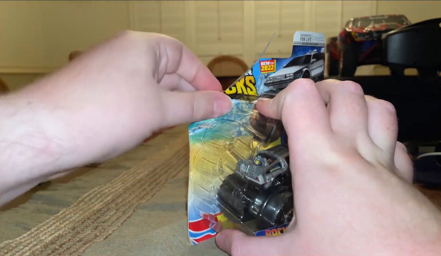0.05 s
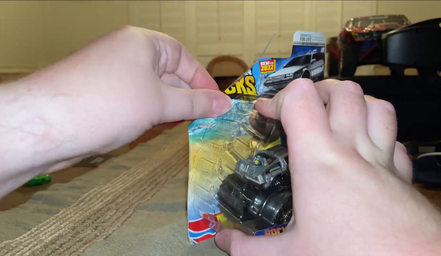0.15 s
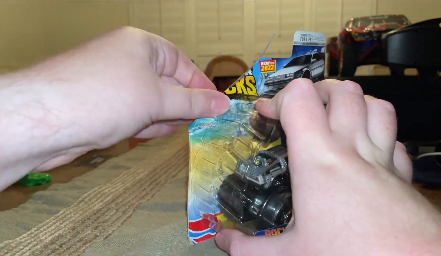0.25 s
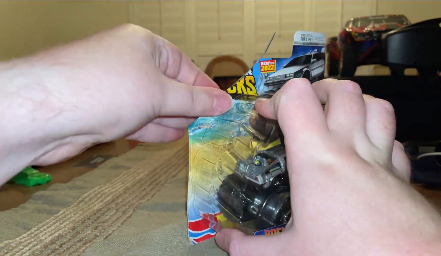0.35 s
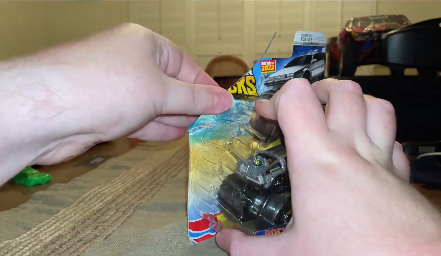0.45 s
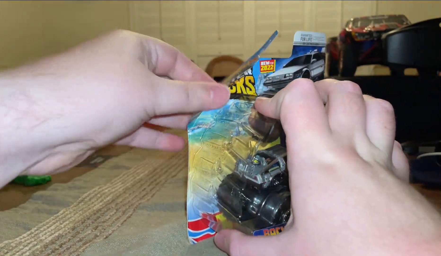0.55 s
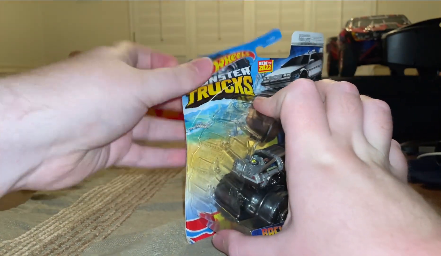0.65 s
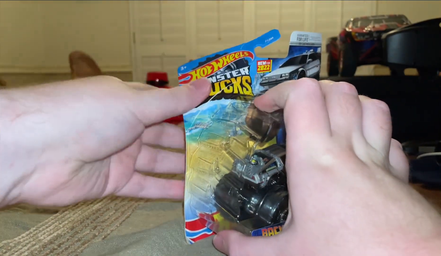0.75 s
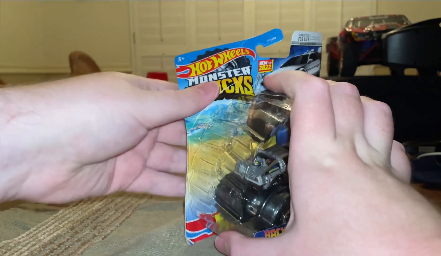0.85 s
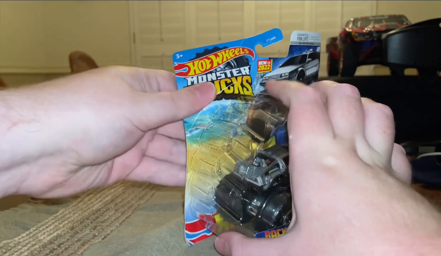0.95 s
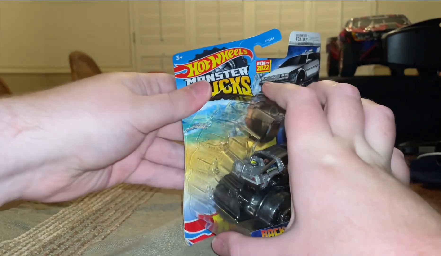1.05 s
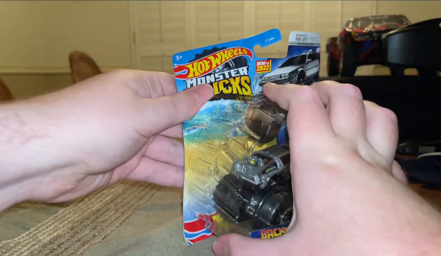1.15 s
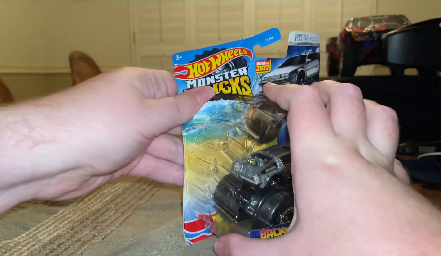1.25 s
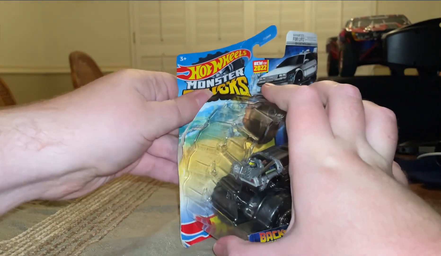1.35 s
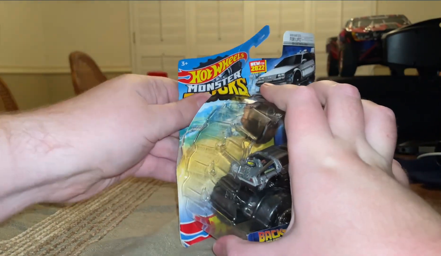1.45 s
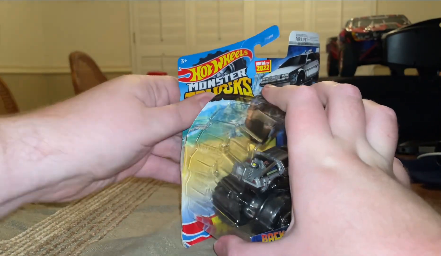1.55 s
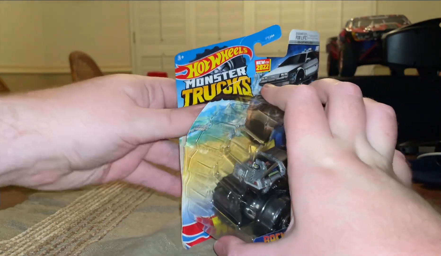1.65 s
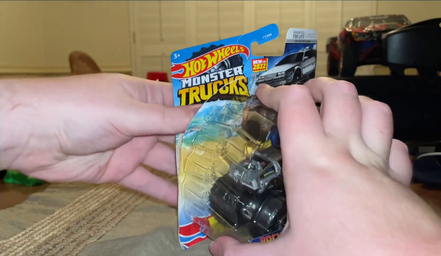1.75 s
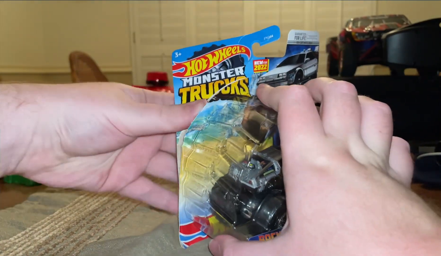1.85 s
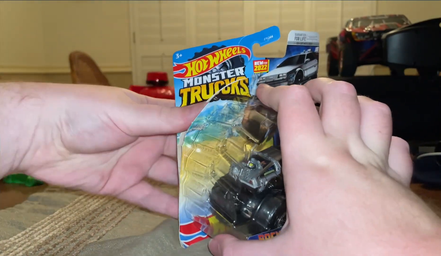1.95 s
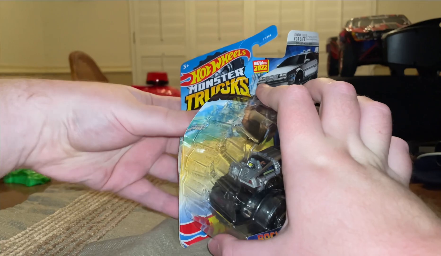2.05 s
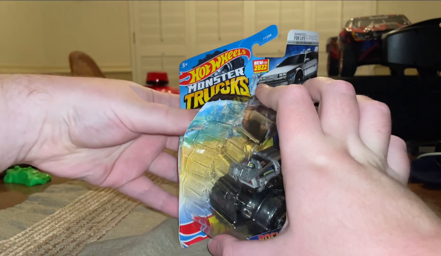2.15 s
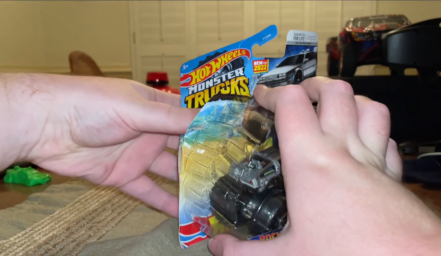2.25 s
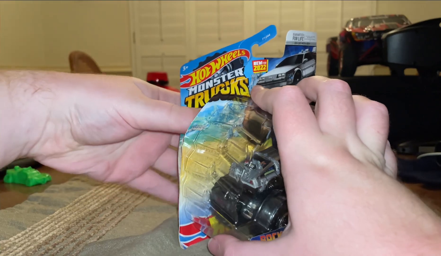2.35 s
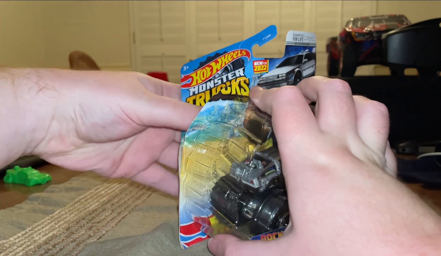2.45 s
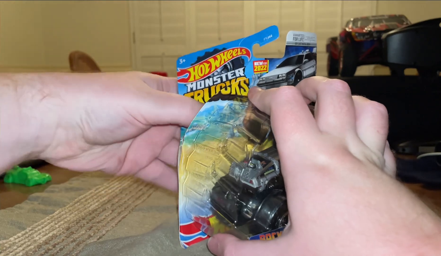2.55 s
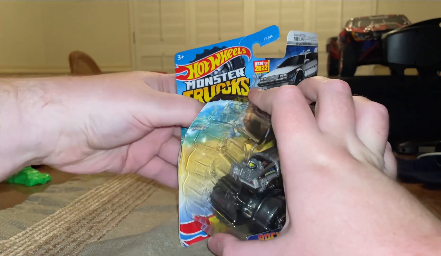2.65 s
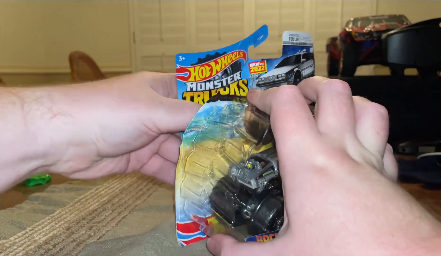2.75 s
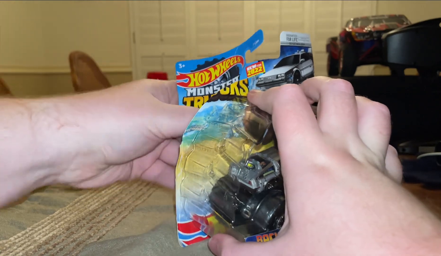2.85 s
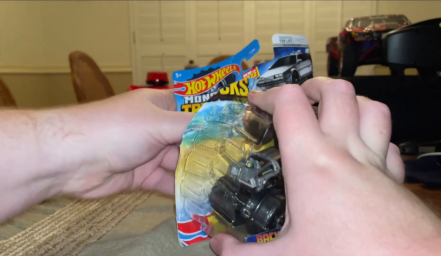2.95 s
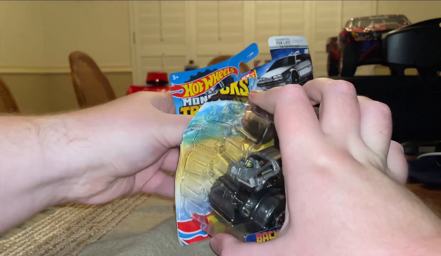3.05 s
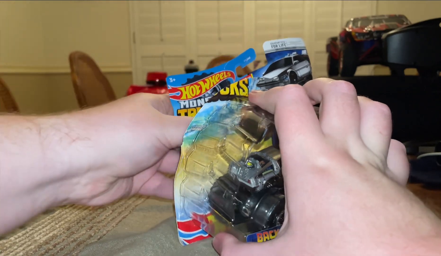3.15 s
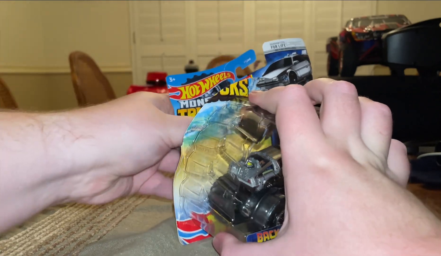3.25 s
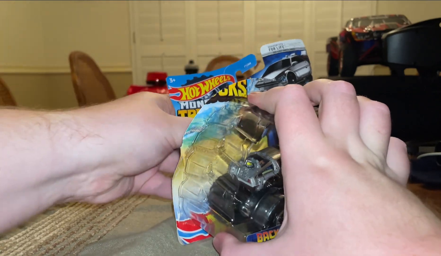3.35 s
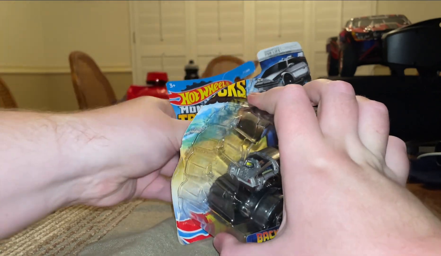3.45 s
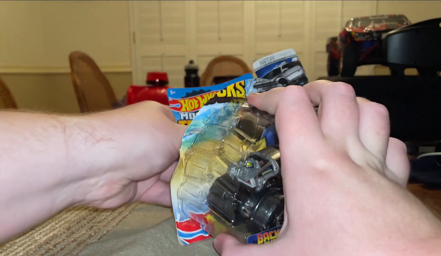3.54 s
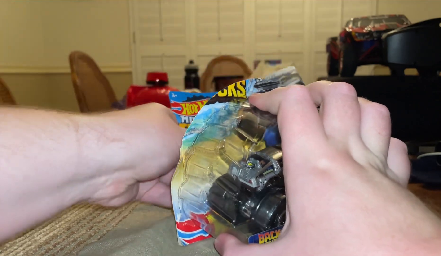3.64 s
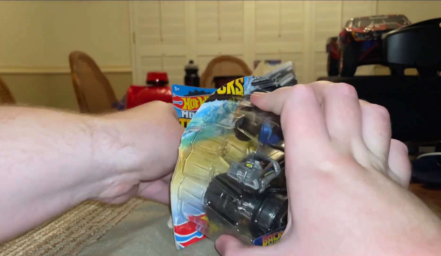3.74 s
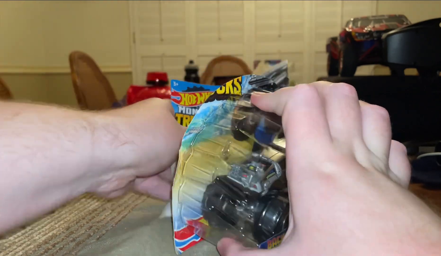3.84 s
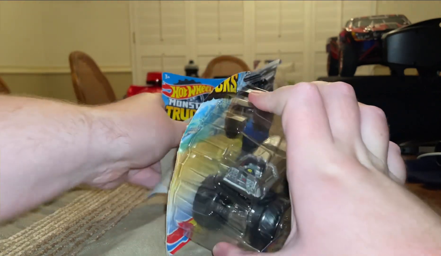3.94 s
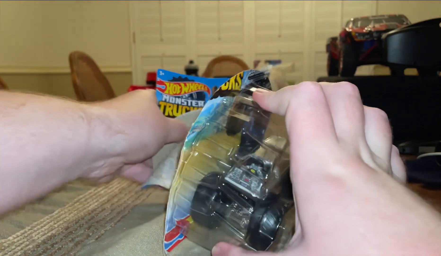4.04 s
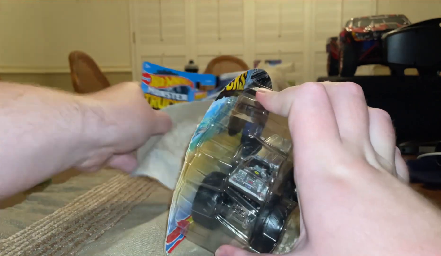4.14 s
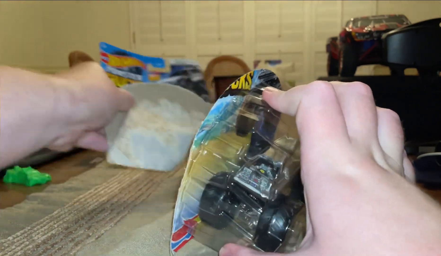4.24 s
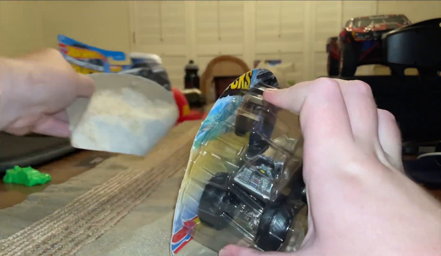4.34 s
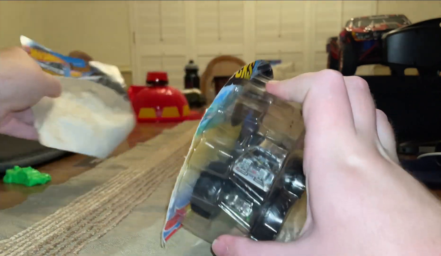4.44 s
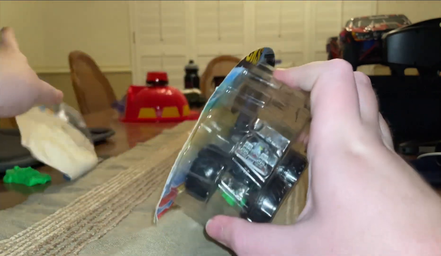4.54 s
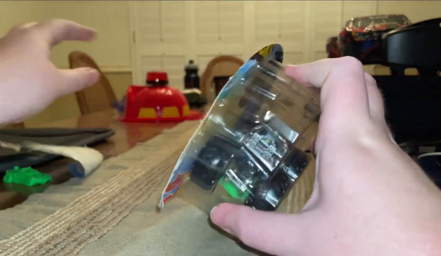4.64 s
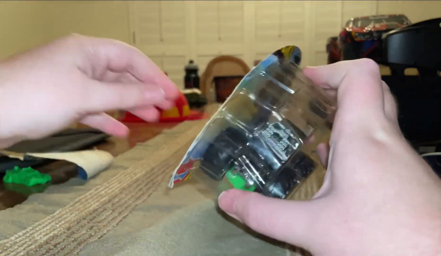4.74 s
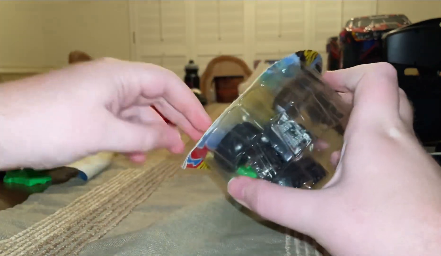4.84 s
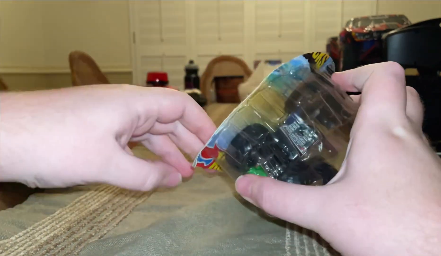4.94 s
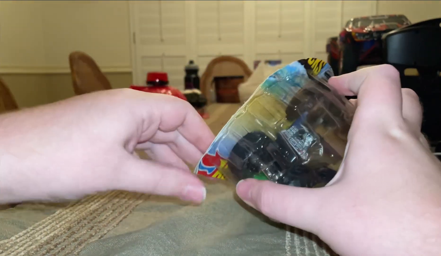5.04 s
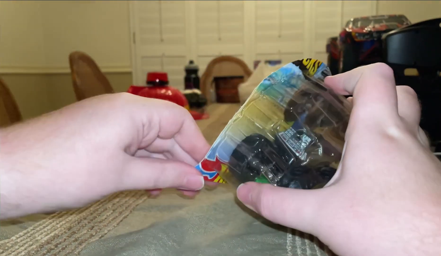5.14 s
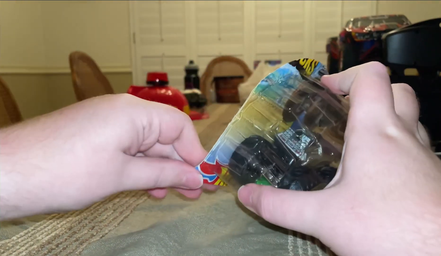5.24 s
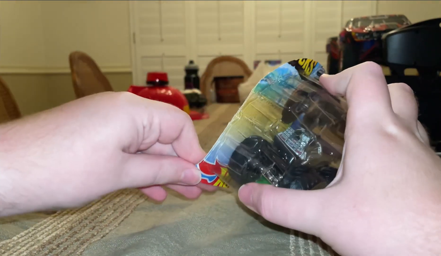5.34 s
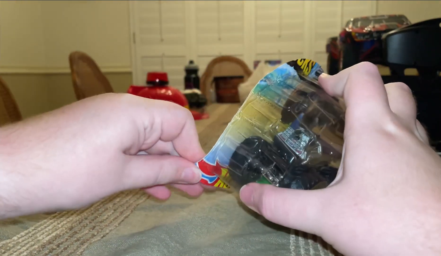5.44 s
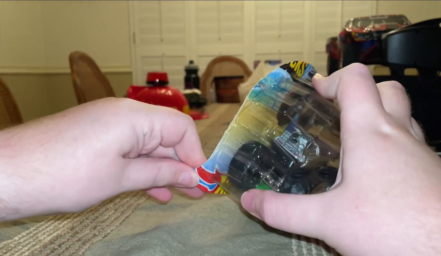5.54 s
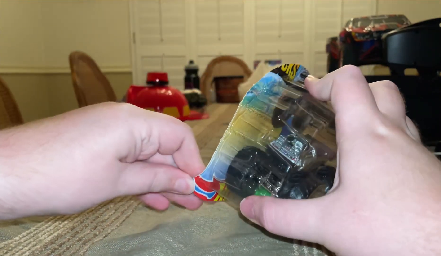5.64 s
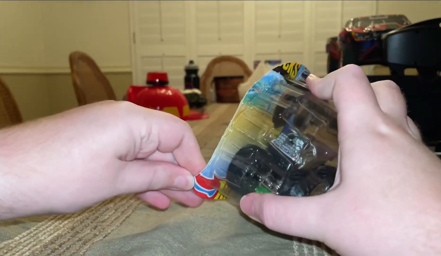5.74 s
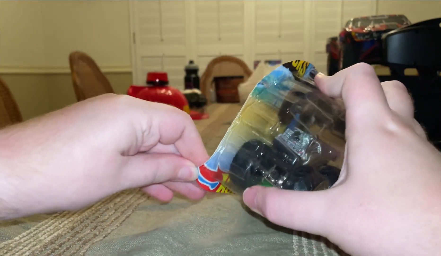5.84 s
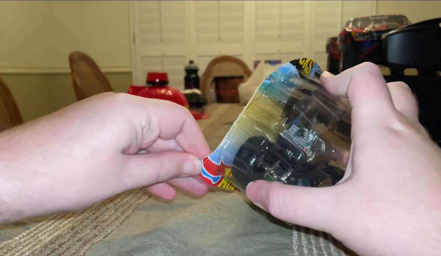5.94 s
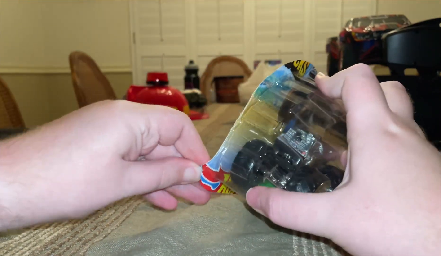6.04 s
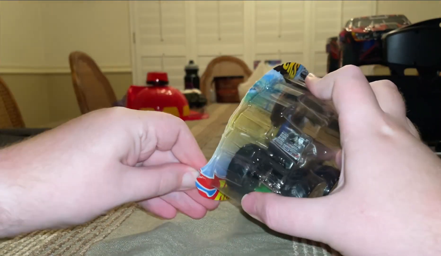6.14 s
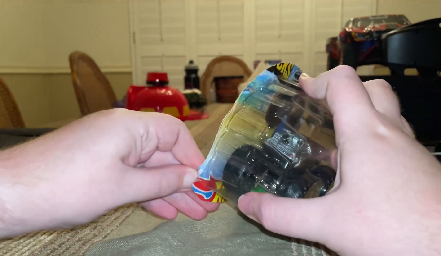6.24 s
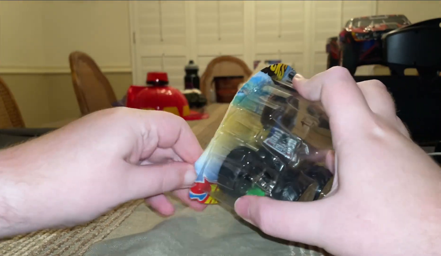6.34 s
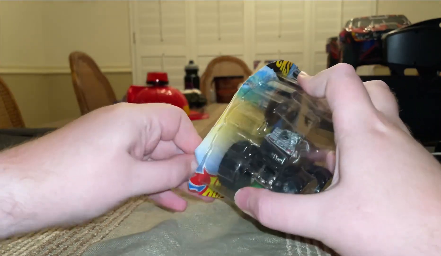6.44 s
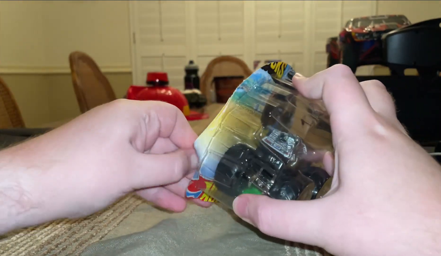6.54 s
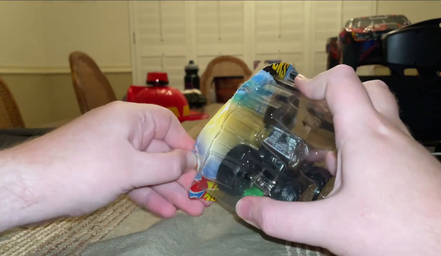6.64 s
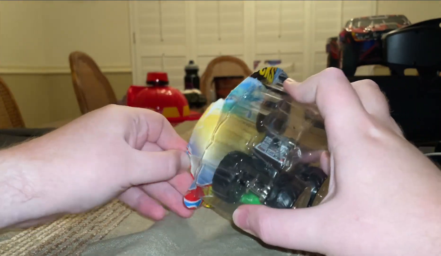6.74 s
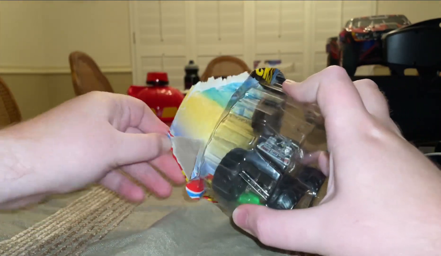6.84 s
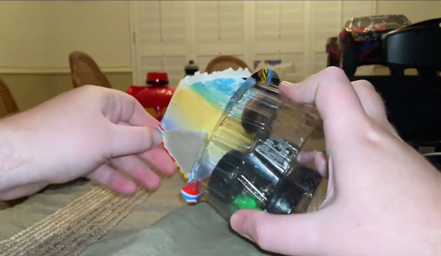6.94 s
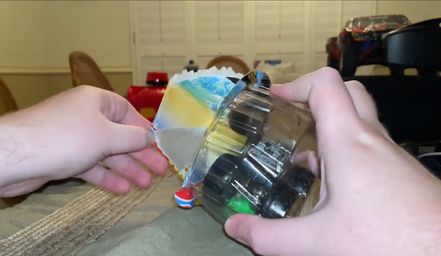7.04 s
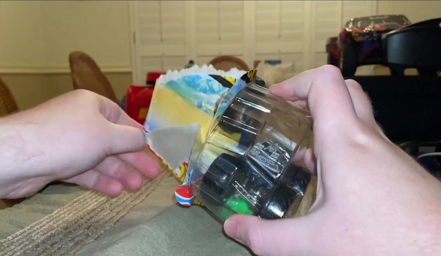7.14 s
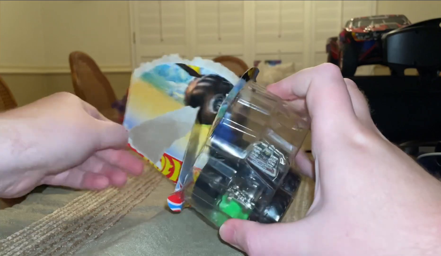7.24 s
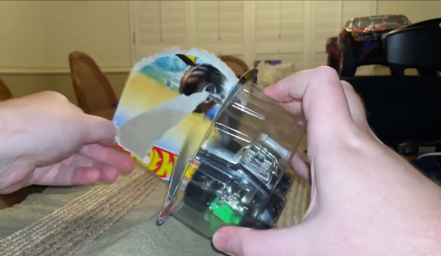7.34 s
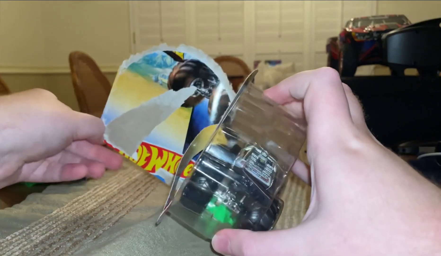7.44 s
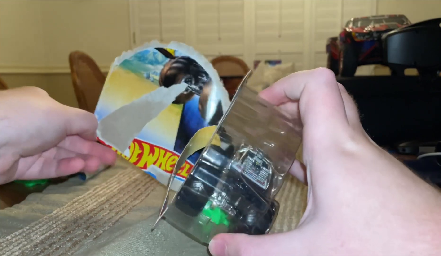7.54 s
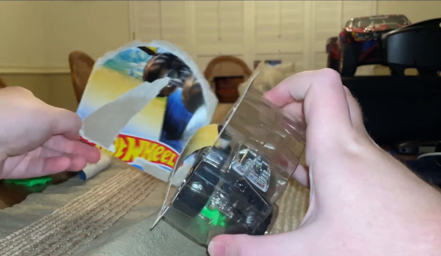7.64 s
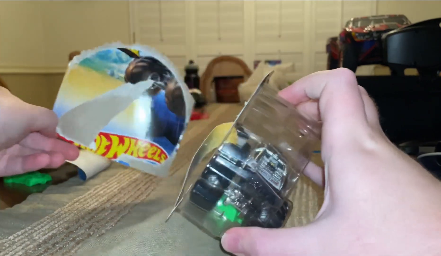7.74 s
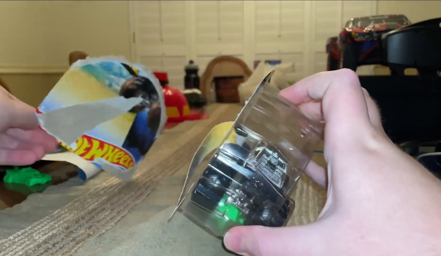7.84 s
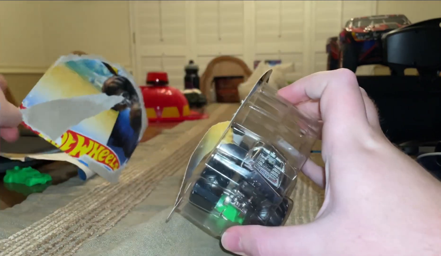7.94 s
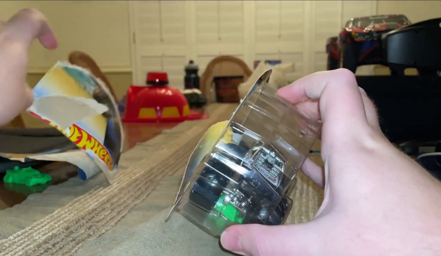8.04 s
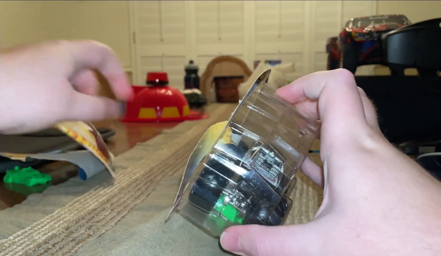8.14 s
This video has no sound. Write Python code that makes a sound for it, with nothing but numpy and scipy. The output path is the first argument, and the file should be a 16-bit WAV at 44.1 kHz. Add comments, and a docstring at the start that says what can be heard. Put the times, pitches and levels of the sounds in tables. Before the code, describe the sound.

Close stereo pickup at a table in a small, lightly echoing room. Thin hard plastic crackles and pops under prying fingers, with a few loud hollow snaps. Cardboard then rips off its glue in jerky tugs with sharp buckling. A near-quiet pause holds small ticks and one soft bump, before a second, denser tearing pull ends abruptly into faint low rumble.

```python
"""A hard plastic blister buckles with sharp snaps as hands pry its cardboard backing off at a table.
Each snap is a noisy crack plus damped tones of the wall, the tray and the card; some floors pop with
a sinking pitch. The card tears off its glue seam in two long pulls, made of random tiny breaks in
three bands. Fingers rub as stick-slip impulses through resonances. Decaying noise makes the echo of
a small room, resonances its boom, over a low rumble and one soft bump of the dropped card."""
import sys
import numpy as np
from scipy import signal
from scipy.fft import rfft, irfft, next_fast_len
from scipy.io import wavfile
from scipy.ndimage import map_coordinates

SR = 44100
rng = np.random.default_rng(int(sys.argv[2]) if len(sys.argv) > 2 else 0)


def waveform_to_disk(signal):
    """Save audio, clipped to [-1, 1], as 16-bit WAV at the path in sys.argv[1]."""
    frames = np.transpose(np.atleast_2d(signal))
    scaled = np.clip(frames, -1, 1) * 32767
    samples = np.round(scaled).astype(np.int16)
    wavfile.write(sys.argv[1], SR, samples)


N = 361179
TOP_HZ = 16300  # nothing sounds above this


def amp(db):
    """Turn decibels into gain."""
    return 10 ** (np.asarray(db) / 20)


def unit(x):
    """Scale x to rms 1."""
    return x / np.sqrt(np.mean(x ** 2) + 1e-20)


def crest(x):
    """Scale x so that its envelope peaks at 1."""
    return x / np.abs(signal.hilbert(x)).max()


def along(points, hz):
    """Read a curve of (Hz, value) points on a log frequency axis."""
    f, v = np.transpose(points)
    return np.interp(np.log(hz + 1), np.log(f + 1), v)


def filtered(x, response):
    """Multiply the spectrum of x by a complex response of frequency."""
    n = x.shape[-1]
    m = next_fast_len(n + 4096)  # padded, so that the end does not wrap to the start
    spectrum = rfft(x, m) * response(np.fft.rfftfreq(m, 1 / SR))
    return irfft(spectrum, m)[..., :n]


def coloured(x, gain, size=2048):
    """Filter x causally (minimum phase) with the given gain of frequency."""
    cepstrum = irfft(np.log(np.maximum(gain(np.fft.rfftfreq(size, 1 / SR)), 1e-6)))
    # folding the second half onto the first puts all the response after time zero
    cepstrum[1:size // 2] *= 2
    cepstrum[size // 2 + 1:] = 0
    return signal.fftconvolve(x, irfft(np.exp(rfft(cepstrum))))[:len(x)]


def wobble(rate):
    """Draw a smooth random curve with this many knots per second."""
    knots = rng.standard_normal(int(N * rate / SR) + 4)
    return map_coordinates(knots, [np.arange(N) * rate / SR])


def slips(rate, spread_db):
    """Tiny impulses at random times, unequal in size and of either sign, scaled to rms 1."""
    size = amp(spread_db * np.minimum(rng.standard_normal(N), 2))
    happens = rng.random(N) < rate / SR
    return unit(happens * size * rng.choice([-1, 1], N))


def add(track, s, sound):
    """Mix a sound into the track at time s."""
    part = track[..., max(round(s * SR), 0):][..., :sound.shape[-1]]
    part += sound[..., :part.shape[-1]]


def resonance(f, hz, width):
    """Response of one damped mode."""
    return 1j * f * width / (hz * hz - f * f + 1j * f * width)


def resonate(x, modes):
    """Send x through resonances side by side, given as (Hz, width Hz, dB)."""
    return filtered(x, lambda f: sum(amp(db) * resonance(f, hz, width) for hz, width, db in modes))


def ring(modes, t, swell_cycles, scatter_db):
    """Damped (Hz, dB, t60) modes, each struck with a new strength and slightly detuned by the grip."""
    hz, db, t60 = np.transpose(modes)[:, :, None]
    strength, detune = rng.standard_normal((2, len(modes), 1))
    waves = np.sin(2 * np.pi * hz * (1 + .01 * detune) * t)
    swell = 1 - np.exp(-(t * hz / swell_cycles) ** 2)  # the sheet takes a moment to flip over
    sides = (-1) ** np.arange(len(modes))[:, None]  # neighbouring modes start in opposite directions
    decay = amp(db + scatter_db * strength - 60 * t / t60)
    motion = np.sum(sides * decay * waves * swell, 0)
    # a thin sheet radiates no deep bass
    no_bass = signal.butter(2, hz.min() / 2, "high", fs=SR, output="sos")
    return crest(signal.sosfilt(no_bass, motion))


def grains(pitch, octaves, cycles, spread_db, count, size):
    """Tiny breaks at random times, each ringing briefly at its own pitch around the (s, Hz) curve."""
    chance = rng.standard_normal((count, 2))
    start, sign = rng.integers(0, N, count), rng.choice([-1, 1], (count, 1))
    centre_hz = np.interp(start / SR, *np.transpose(pitch))
    hz = np.minimum(centre_hz * 2 ** (octaves * chance[:, 0]), TOP_HZ)
    turns = hz[:, None] * np.arange(size) / SR
    strength = sign * amp(spread_db * np.minimum(chance[:, 1:], 2))
    waves = strength * np.sin(2 * np.pi * turns) * np.exp(-turns / cycles)
    where = start[:, None] + np.arange(size)
    return unit(np.bincount(where.ravel(), waves.ravel(), N)[:N])


def ports(x, right_db, lag_ms=0.097, detour=2.2, detour_hz=650):
    """Sound is louder and earlier at the nearer microphone port; the time gap is widest in the low mids."""
    lead = lag_ms / 1000 * np.tanh(right_db)  # seconds
    path = lambda f: 1 + detour * np.exp(-(2 * np.log((f + 1) / detour_hz)) ** 2)
    half = lambda f: amp(right_db / 2) * np.exp(1j * np.pi * f * lead * path(f))
    return filtered(x, lambda f: np.array([1 / half(f), half(f)]))


# The colour of the low noise. Each row: frequency in Hz, relative level in dB.
RUMBLE_COLOUR = [(20, -21.5), (52, -5.5), (108, -9), (165, -2.5), (250, -10.5), (360, -8), (440, -19.5),
                 (540, -35.5), (1000, -34.5), (3000, -36), (6000, -41.5), (8500, -64), (11000, -52.5),
                 (16000, -72.5)]


def rumble(db=-60, side_db=-11):
    """The low steady noise of the house: coloured noise, mostly alike on both sides."""
    noise = rng.standard_normal((2, N))
    mid, side = unit(filtered(noise, lambda f: amp(along(RUMBLE_COLOUR, f))))
    return amp(db) * np.array([mid + amp(side_db) * side, mid - amp(side_db) * side])


# How long the room rings. Each row: frequency in Hz, time to fade by 60 dB in seconds.
ROOM_FADE = [(150, 0.36), (400, 0.18), (1000, 0.59), (3000, 0.5), (7000, 0.32), (14000, 0.08)]


def room(x, wet_db, early_db, count=5):
    """Early bounces off table and walls, then a tail; noise patterns take turns as the pack moves."""
    out, t = np.zeros((2, N)), np.arange(N) / SR
    for k in range(count):
        hz, age, z = signal.stft(rng.standard_normal((2, SR // 2)), SR, nperseg=256)
        apart = np.clip(hz / 1600, 0, 1)[:, None] * np.pi / 4  # long waves reach both ports alike
        z = np.array([np.cos(apart) * z[0] + side * np.sin(apart) * z[1] for side in (1, -1)])
        late = amp(wet_db - 60 * age / along(ROOM_FADE, hz)[:, None])
        early = amp(early_db - 60 * age / 0.052)
        onset = np.clip(age / 0.0026, 0, 1)
        tail = signal.istft(z * (late + early) * onset, SR, nperseg=256)[1] / np.sqrt(SR / 40)
        # each pattern fades in and out again, eight steps a second
        place = np.abs((t * 8 - k + count / 2) % count - count / 2)
        share = np.cos(np.minimum(place, 1) * np.pi / 2)
        out += signal.fftconvolve((x * share)[None], tail, axes=1)[:, :N]
    return out


# The colour of the room's answer. Each row: frequency in Hz, gain in dB.
ECHO_COLOUR = [(60, -1.5), (200, 4), (340, 5.5), (560, 4), (850, -5), (1130, -2), (1450, 1.5), (2400, 4.5),
               (5000, 2.5), (14000, 2.5)]


def echo(shell, floor, card):
    """The room answers the right-hand sound of the plastic and, more strongly, of the card."""
    answer = room(shell[1] + amp(-2.5) * floor[1], wet_db=-17.5, early_db=-8.5)
    answer += room(card[1], wet_db=-10.5, early_db=-4.5)
    return filtered(answer, lambda f: amp(along(ECHO_COLOUR, f)))


# Standing waves between table and walls. Each row: frequency in Hz, width in Hz, gain in dB.
STANDING_WAVES = [(164, 4.5, -4), (217, 7.5, -8.5), (258.2, 6.6, 4.5), (344.4, 2.9, 1.5), (430, 6.4, -7.5),
                  (487, 9.9, -7.5)]


def boom(shell, card):
    """Shell and card set off the standing waves of the room."""
    return resonate(shell + amp(-6.5) * card, STANDING_WAVES)


LANDING_S = 4.872


def landing(db=-42, hz=48, t60=0.18):
    """The torn-off card drops on the table, which gives one soft, deep bump."""
    out, t = np.zeros(N), np.arange(SR // 3) / SR
    modes = [(hz, 0, t60), (2.56 * hz, -3, t60 / 2)]
    add(out, LANDING_S, amp(db) * ring(modes, t, swell_cycles=0.27, scatter_db=-4))
    return out


# Fingers and card slide on the plastic. Each row: start in seconds, swell in seconds, fade in seconds,
# level in dB before the stereo placing, pitch in Hz, half the width in Hz of each of the two equal
# resonances in a row, slips per second.
RUBS = [(0.291, .054, 0.0082, -40.5, 10970, 2313, 1900), (1.071, 0.033, 0.041, -58, 11000, 9060, 210),
        (1.102, 0.18, 0.054, -46, 6740, 554, 1400), (1.206, 0.073, 0.23, -47.5, 11000, 3057, 1100),
        (1.831, 0.048, 0.025, -31.5, 924, 129.4, 1400), (1.827, 0.054, 0.011, -49, 5200, 1600, 860),
        (1.872, 0.011, 0.011, -47, 4500, 501, 970), (1.993, 0.01, 0.037, -38.5, 885, 219, 1100),
        (1.994, 0.0043, 0.017, -41.5, 5100, 1300, 750), (2.448, 0.07, 0.24, -59.5, 6000, 7000, 120),
        (4.574, 0.01606, 0.061, -42, 2300, 623, 1600), (4.578, 0.021, 0.028, -43, 1290, 220, 2400),
        (5.02, 0.017, 0.135, -65.5, 840, 488, 290), (5.11, .035, 0.039, -71.5, 4940, 5120, 1400),
        (5.34, 0.042, 0.045, -73.5, 4900, 5000, 1400), (5.519, 0.0034, .006, -58, 9560, 9170, 2300),
        (6.082, 0.077, 0.028, -52.5, 10700, 7310, 690), (6.2, 0.029, 0.074, -53, 11000, 7220, 370),
        (6.27, 0.023, 0.032, -44, 550, 250, 670), (6.4, 0.027, 0.041, -41.5, 507, 260, 620),
        (6.505, 0.049, 0.02, -42, 910, 392, 220), (6.324, 0.02, 0.044, -39, 9400, 7130, 2200),
        (6.446, 0.046, 0.13, -43.5, 8750, 6000, 1500), (6.58, .11, .03, -40, 820, 399, 760),
        (6.92, 0.05, 0.15, -35.5, 880, 402.6, 900), (6.93, .04, .13, -40.5, 4200, 4020, 350),
        (3.46, .04, .06, -47, 8500, 6900, 2300), (7.555, 0.017, 0.034, -47.5, 8400, 7000, 2300),
        (8.12, 0.027, 0.057, -67, 6530, 7960, 1900)]


def rubbing():
    """Stick-slip under a sliding finger or card edge excites one resonance of the sheet."""
    out, t = np.zeros(N), np.arange(N) / SR
    for s, swell, fade, db, hz, width, rate in RUBS:
        stroke = np.interp(t - s, [0, swell, swell + fade], [0, 1, 0])
        catches = slips(rate, spread_db=-1.5)
        squeak = unit(filtered(catches, lambda f: resonance(f, hz, 2 * width) ** 2))
        out += amp(db) * stroke * squeak
    return out


# Steady strain of the hands in four stages: prying, first pull, regripping, second pull.
# Each row: time in seconds, rustle of the card in dB, fizz of the fibres in dB, both before trims.
STRAIN = [
    [(0.0, -50.5, -65.5), (1.08, -56, -63), (1.37, -51.5, -42), (1.53, -45, -56), (1.89, -49, -56.5),
     (2.07, -54, -78), (2.36, -53.5, -62), (2.67, -50, -44.5)],
    [(2.76, -48, -41.5), (2.91, -45, -50.5), (3.166, -48, -42.5), (3.27, -49, -46.5), (3.396, -45, -43.5),
     (3.764, -42.5, -42.5), (4.072, -44, -45), (4.338, -57, -62), (4.52, -65.5, -67)],
    [(4.75, -60, -58.5), (4.938, -58, -78), (5.184, -69.5, -80), (5.668, -71.5, -72.5), (6.136, -71, -76.5),
     (6.276, -57.5, -60.5), (6.448, -50, -52.5), (6.68, -46, -42)],
    [(6.76, -40, -45.5), (6.89, -40.5, -34), (7.256, -39.5, -43), (7.382, -43, -47.5), (7.51, -50.5, -48),
     (7.592, -46.5, -43), (7.67, -44.5, -59.5), (7.902, -71, -69), (8.1, -78, -104.5)],
]


def strain(s):
    """Read the levels in dB of the rustle and of the fizz at times s."""
    knots, *levels = np.concatenate(STRAIN).T
    return [np.interp(s, knots, level) for level in levels]


# The card gives way in short tugs. Each row: start of the hold in seconds, hold in seconds,
# tearing level in dB, flapping level in dB, both before the band trims.
TUGS = [(0.351, 0.0082, -48, -45), (0.664, 0.0082, -43, -33.5), (0.845, 0.012, -61, -46),
        (1.244, 0.032, -48.5, -85), (1.301, 0.0098, -33.5, -39), (1.35, 0.04, -40.5, -49),
        (1.592, 0.0062, -44, -44), (1.855, 0.021, -57, -52), (2.408, 0.028, -54, -44),
        (2.743, 0.02, -26.5, -47), (2.838, 0.022, -33, -44.5), (2.917, 0.036, -32, -50),
        (3.008, 0.0089, -33, -45), (3.118, 0.0041, -31.5, -61), (3.3, 0.031, -42, -80),
        (3.369, 0.0045, -56, -50), (3.481, 0.039, -32.5, -44), (3.609, 0.026, -31.5, -50),
        (3.725, 0.0091, -22.5, -38.5), (3.823, 0.048, -29.5, -38.5), (3.908, 0.044, -32, -37),
        (4.034, 0.084, -35, -40), (4.149, 0.068, -31, -38.5), (4.613, 0.081, -45.5, -49),
        (5.02, 0.13, -71.5, -60.5), (5.36, 0.054, -66.5, -67.5), (5.898, 0.013, -71, -55),
        (6.129, 0.03, -56, -54.5), (6.232, 0.0054, -45.5, -53), (6.354, 0.017, -37.5, -41),
        (6.487, 0.057, -41.5, -51), (6.733, 0.058, -32, -42), (6.805, 0.017, -27, -32.5),
        (6.844, 0.007, -33.5, -49), (7.135, .03, -36.5, -48), (7.182, 0.027, -29, -32.5),
        (7.254, 0.004, -28, -40.5), (7.346, 0.033, -29.5, -34), (7.59, 0.0079, -32.5, -59.5),
        (7.639, 0.039, -32.5, -39.5)]
TUG_RISE_DB_PER_S, TUG_FALL_DB_PER_S = 599.5, 500
UNSTEADY_DB, UNSTEADY_PER_S = 2, 20  # the hands never pull quite evenly


def peel(flap_db=-5, rustle_db=-5, fizz_db=-5, tug_fizz_db=-8):
    """Gains of flapping, tearing and fizz: the wavering strain plus tugs that swell, hold and let go."""
    t = np.arange(N) / SR
    rustle, fizz = strain(t) + UNSTEADY_DB * wobble(UNSTEADY_PER_S)
    gains = amp([rustle + flap_db, rustle + rustle_db, fizz + fizz_db])
    lead = .1  # seconds of swell before the hold
    age = np.arange(SR // 2) / SR - lead
    for s, hold, tearing_db, flapping_db in TUGS:
        rise_db = TUG_RISE_DB_PER_S * np.minimum(age, 0)
        fall_db = TUG_FALL_DB_PER_S * np.maximum(age - hold, 0)
        band_db = np.array([[flapping_db], [tearing_db], [tearing_db + tug_fizz_db]])
        add(gains, s - lead, amp(rise_db - fall_db + band_db))
    return gains


# The colour of the tearing card. Each row: frequency in Hz, relative level in dB.
CARD_COLOUR = [(25, -48), (60, -9), (130, -9.5), (280, -7), (520, -5.5), (850, 4), (1100, 3.5), (1400, -6),
               (1850, -6.5), (2500, -18), (6300, -12), (7800, -19.5), (11000, -19.5), (12600, -23.5),
               (14000, -40)]
# Pitch of the wall beside the tear, which shifts as the card comes away.
# Each row: time in seconds, pitch in Hz.
TEAR_PITCH = [(1.3, 1070), (2.8, 1180), (3.6, 1000), (3.9, 885), (4.2, 1000), (6.5, 965), (7.15, 830),
              (7.7, 1020)]
# How unevenly the seam catches and gives. The entries: flapping, tearing and fizz, in dB.
CATCH_DB = [1.2, 1.0, 2.6]
CATCH_PER_S = 65


def tearing(flap_hz=450, fizz_hz=2500, flap_db=0.0, tear_db=0, fizz_db=0,
            pop_db=-15, crackle_db=-1.0, crackle_hz=3600):
    """Fibres and glue let go in clumps; each break fizzes and shakes the card like a loudspeaker cone."""
    clumps = amp(1.8 * wobble(110))
    fibres = np.array([slips(rate=1500, spread_db=4), slips(rate=1500, spread_db=4)]) * clumps
    bundles = slips(rate=110, spread_db=2)
    # whole bundles pop loudly enough to ring the wall; specks of glue crackle, each at its own pitch
    pops = grains(TEAR_PITCH, octaves=0.15, cycles=0.92, spread_db=0.2, count=3500, size=512)
    crackle = grains([(0, crackle_hz)], octaves=.6, cycles=1.5, spread_db=5, count=1300, size=192)
    # the seam is wide: its breaks reach the ports from two sides
    near = fibres[0] + .5 * bundles + amp(pop_db) * pops + amp(crackle_db) * crackle
    breaks = ports(near, right_db=10.0) + amp(5.0) * ports(fibres[1], right_db=-1.7)
    below = lambda f, edge_hz: 1 / np.sqrt(1 + (f / edge_hz) ** 12)
    above = lambda f, edge_hz: np.sqrt(1 - below(f, edge_hz) ** 2)
    bands = [lambda f: below(f, flap_hz),
             lambda f: above(f, flap_hz) * below(f, fizz_hz),
             lambda f: above(f, fizz_hz)]
    out = np.zeros((2, N))
    catch = wobble(CATCH_PER_S)
    for band, gain, db, catch_db in zip(bands, peel(), (flap_db, tear_db, fizz_db), CATCH_DB):
        colour = lambda f: band(f) * amp(along(CARD_COLOUR, f))
        sound = unit(np.array([coloured(side, colour) for side in breaks]))
        patches = unit(amp(catch_db * catch + wobble(80)))  # the seam catches and gives
        out += amp(db) * gain * patches * sound
    return out


# Upper modes of the dome when dented. Each row: frequency in Hz, relative level in dB,
# time to fade by 60 dB in seconds.
PING = [(1800, 3.5, 0.03), (2270, -1.5, 0.025), (2500, -8.5, 0.083)]
DENT_S = .9975


def dent(db=-22):
    """A thumb dents the sealed dome directly, which adds a bright ping to its snap."""
    out, t = np.zeros(N), np.arange(SR // 3) / SR
    add(out, DENT_S, amp(db) * ring(PING, t, swell_cycles=1, scatter_db=-11))
    return ports(out, right_db=6)


# The tray floor flips through. Each row: start in seconds, level in dB, start pitch in Hz, end pitch
# in Hz, time to fade by 60 dB in seconds, hollow ring in dB; levels before the stereo placing.
FLIPS = [(.186, -34, 613, 285, 0.079, -59), (.509, -40, 486, 275, 0.078, -50),
         (.6565, -17.5, 730, 443, 0.092, -34.5), (.668, -20, 426, 325, .09, -30.5),
         (1.418, -21, 726, 268, 0.073, -37), (1.595, -26, 251, 102.6, 0.077, -50),
         (3.121, -22, 440, 250, .04, -46), (3.3354, -14, 333, 215, 0.055, -25)]
RELAX_S = .014  # time constant with which a flipped floor settles to its end pitch
# The hollow of the tray rings on after a flip. Each row: frequency in Hz, relative level in dB,
# time to fade by 60 dB in seconds.
HOLLOW = [(254, -2, .2), (342.8, 2, 0.18), (465, -9.5, .17)]


def flips(hollow_db=0):
    """The tray floor pops through, its pitch sinks as it relaxes, and its hollow rings on."""
    out, t = np.zeros(N), np.arange(SR // 3) / SR
    for s, db, start_hz, end_hz, t60, ring_db in FLIPS:
        hz = end_hz + (start_hz - end_hz) * np.exp(-t / RELAX_S)
        turns = np.cumsum(hz) / SR
        pop = crest(np.sin(2 * np.pi * turns) * (1 - np.exp(-turns ** 2)) * amp(-60 * t / t60))
        hollow = ring(HOLLOW, t, swell_cycles=15, scatter_db=-3.5)
        add(out, s, amp(db) * pop + amp(ring_db + hollow_db) * hollow)
    return ports(out, right_db=3.0)


# Lightly damped modes of the free blister dome. Each row: frequency in Hz, width in Hz, gain in dB.
DOME_MODES = [(1054, 14, -6), (1120, 16, -2), (1180, 7.9, -2)]
OPENED_S, OPEN_DB = 2.72, -11  # once the card no longer seals the dome, less sound drives it


def dome(shell):
    """The hollow dome rings on after any snap near its own pitch, most while the card still seals it."""
    opened = np.arange(N) / SR > OPENED_S
    return resonate(shell * amp(OPEN_DB * opened), DOME_MODES)


# Wall ring above the strain in dB, usual pitch in Hz, its scatter in octaves, fade by 60 dB in seconds.
CRINKLE_DB, CRINKLE_HZ, CRINKLE_OCTAVES, CRINKLE_T60 = 6, 815, 0.77, 0.013
CRINKLE_THUD_DB, CRINKLE_CRACK_DB = -22, -7  # relative to the wall ring
CRINKLE_DOUBLING_DB = 5  # this much more strain makes crinkles twice as frequent
CRINKLE_SCATTER_DB = 2.5
CRINKLE_MAX_DB = -42.5  # before scatter: the wall stores only so much strain before it buckles


def crinkles(count=110):
    """Small buckles at random moments, denser and stronger under more strain; rows like those of SNAPS."""
    t = np.arange(0, N, SR // 100) / SR
    due = np.cumsum(2 ** (strain(t)[0] / CRINKLE_DOUBLING_DB))
    s = np.interp((np.arange(count) + rng.random(count)) / count, due / due[-1], t)
    size, pitch, thud, crack_size = rng.standard_normal((count, 4)).T
    db = np.minimum(strain(s)[0] + CRINKLE_DB, CRINKLE_MAX_DB) + CRINKLE_SCATTER_DB * size
    hz = CRINKLE_HZ * 2 ** (CRINKLE_OCTAVES * pitch)
    thud_db = db + CRINKLE_THUD_DB + CRINKLE_SCATTER_DB * thud
    crack_db = db + CRINKLE_CRACK_DB + CRINKLE_SCATTER_DB * crack_size
    return np.column_stack(np.broadcast_arrays(s, db, hz, CRINKLE_T60, 0, thud_db, crack_db))


# The colour of a crack. Each row: frequency in Hz, relative level in dB.
CRACK_COLOUR = [(600, -54.5), (1800, 5), (2600, -1), (4300, 7.5), (6500, 7.5), (8000, -11), (11800, -6.5),
                (14000, -20.5), (16500, -17)]


def crack(t, splinter_db, splinter_t60):
    """A crease cracks over: a spike of noise with a weaker, longer splintering, each in its own colour."""
    spike = amp(-60 * t / .004)
    splinter = amp(splinter_db - 60 * t / splinter_t60)
    burst = rng.standard_normal(len(t)) * (spike + splinter)
    crease = np.column_stack([np.geomspace(1000, TOP_HZ, 24), 2 * rng.standard_normal(24)])  # Hz, dB
    return crest(coloured(burst, lambda f: amp(along(CRACK_COLOUR, f) + along(crease, f))))


# The shell buckles. Each row: start in seconds, wall ring in dB, wall pitch in Hz, time for the ring
# to fade by 60 dB in seconds, overtones in dB per octave, tray thud in dB, crack in dB.
# The three levels are before the trims and the stereo placing.
SNAPS = [(.053, -39, 980, 0.012, 12, -61, -57.5), (.0867, -32, 620, 0.03, 8, -53, -75),
         (.102, -35, 614, 0.051, -7, -44, -61), (.1836, -31, 567, 0.047, 6, -32, -35.5),
         (.19, -44.5, 504, .02, 2, -52, -37.5), (.3421, -29, 950, 0.05, -3, -52, -20.5),
         (.3955, -32.5, 666, 0.012, 17, -39, -48.5), (.505, -39, 430, 0.023, 12, -36, -54.5),
         (.5142, -39, 536, 0.037, 18, -37.5, -42), (.609, -37.5, 610, 0.037, -2, -41, -55),
         (.645, -32, 950, 0.023, 2, -56.5, -32.5), (.655, -23, 745, 0.014, 17, -38, -14),
         (.6585, -37, 596, 0.017, -10, -22, -48.5), (.666, -23, 1100, 0.024, 0, -38, -51),
         (.811, -38.5, 960, .025, -6, -55.5, -63.5), (.832, -41, 1050, .02, 15, -54.5, -55),
         (.9968, -9, 1050, 0.028, -46, -38, -25.5), (1.109, -58, 1100, .02, 5, -69, -45.5),
         (1.281, -26, 635, 0.021, 1, -35, -21.5), (1.2998, -8, 930, 0.0052, -9, -22.5, -8),
         (1.4153, -5, 769, 0.021, 19.5, -24.5, -8), (1.5807, -25.5, 615, 0.017, -20, -46, -34),
         (1.5902, -25.5, 540, 0.0055, 21, -25, -24), (1.8222, -26.5, 800, 0.0065, -4, -35, -57),
         (1.9505, -36, 880, 0.024, -16, -50, -39), (2.316, -40, 920, .025, 13, -38, -44),
         (2.2268, -33.5, 880, 0.036, 0.5, -47, -50.5), (2.4805, -50, 465, .022, -4, -51, -36),
         (2.515, -50, 905, .02, 6, -60, -41.5), (2.5595, -35.5, 620, .02, 13, -35, -30),
         (2.5852, -38, 570, 0.0093, 16, -67, -35), (2.7248, -2, 640, 0.0064, 3.5, -33, -16),
         (3.1183, -5.5, 720, 0.0034, 2, -13.5, -36), (3.1619, -22, 600, 0.016, 12, -28, -29.5),
         (3.238, -30.5, 1040, 0.035, -8, -54, -33), (3.3342, -23, 402, 0.03, 31, -5, -38.5),
         (3.354, -20, 427, 0.023, -13, -22, -54), (3.627, -19.5, 1065, 0.033, -10, -24, -34.5),
         (3.7205, -14, 960, 0.033, 13, -22, -13), (3.749, -22, 530, 0.029, -4, -20, -30),
         (3.8352, -12.5, 820, 0.015, 3, -50, -25), (3.85, -16, 730, 0.027, -13, -31, -23),
         (3.8822, -14, 1050, 0.014, 11, -50, -17), (3.9445, -17.5, 820, 0.019, 1, -26.5, -20),
         (4.17, -20.5, 1160, 0.014, 25, -25.5, -26), (4.2046, -14.5, 1155, 0.012, 21, -29, -14),
         (4.579, -39.5, 1050, 0.037, 0, -44.5, -25.5), (4.6236, -19.5, 1030, 0.05, 11.5, -26.5, -24.5),
         (4.8482, -46, 727, 0.018, 8, -56, -67.5), (4.9148, -46.5, 724, 0.045, -11, -57, -65),
         (5.0078, -38, 730, 0.024, 10, -58, -54), (5.2881, -46.5, 629, 0.063, 9, -52, -62.5),
         (6.0717, -43.5, 683, 0.013, 0, -48, -62), (6.2718, -27, 646, 0.021, 11, -36, -72),
         (6.4838, -25.5, 755, 0.012, -10, -24, -28), (6.7026, -21, 860, 0.025, 19, -37, -24),
         (6.721, -17.5, 690, .025, 13.5, -32, -27.5), (6.7353, -10.5, 857, 0.045, -3, -30, -24.5),
         (6.7662, -10.5, 706, 0.044, 3, -25, -36), (6.8067, -3.5, 770, 0.037, 1, -12.5, -14.5),
         (6.9398, -11, 850, 0.035, -1, -23.5, -16), (7.1119, -0.5, 834, 0.026, -27, -20.5, -16.5),
         (7.1505, -17.5, 820, 0.066, -8, -45, -31), (7.1953, -1.5, 845, 0.0092, -4, -17, -19),
         (7.258, -12, 676, 0.058, 8.5, -31, -17.5), (7.3518, -10.5, 905, 0.018, -9, -22, -14.5),
         (7.377, -20.5, 750, 0.025, 28, -29, -20.5), (7.521, -28.5, 970, 0.032, -4, -54, -43),
         (7.5847, -39.5, 770, 0.03, 3, -31, -19.5), (7.6025, -20, 1035, 0.028, -3, -31, -20.5),
         (7.6296, -7, 825, 0.017, 6, -27, -19), (7.6652, -10.5, 925, 0.054, 7.5, -27, -25.5),
         (8.009, -51, 850, 0.021, -5, -66.5, -59.5)]
# Where the shell gives as the hands work round it. Each row: time in seconds, right minus left in dB.
PLACE = [(0, 0), (.66, 5), (1, 3.5), (1.3, 5), (2.7, 2.5), (3.3, 3.5), (3.9, -3.5), (4.2, -1), (5, 15.5),
         (6.7, 2.5), (7.1, 4.5), (7.6, 2.5)]
# Modes of a buckling wall. Each row: multiple of its pitch, relative level in dB before the overtone slope.
WALL_MODES = [(0.569, -14.5), (.79, -12.5), (0.998, 1.5), (1.319, -11.5), (1.661, -22.5), (2.337, -23)]
# Modes of the whole tray with its card. Each row: frequency in Hz, relative level in dB,
# time to fade by 60 dB in seconds.
TRAY_MODES = [(230, 4.5, 0.045), (350.7, -1.5, 0.055), (432, 0.5, 0.034)]
# Slow bending modes of the card. Each row: frequency in Hz, relative level in dB,
# time to fade by 60 dB in seconds.
SWAY_MODES = [(72.5, -10, 0.082), (112, -0.5, 0.028), (179, -5, 0.041)]


def snaps(ring_db=0, thud_db=-1, sway_db=-9, crack_db=3.5, splinter_db=-11, splinter_t60=0.036,
          lag=0.00051, sway_lag=0.0066):
    """A crease cracks over; the wall around it rings, the whole tray thuds and the card sways."""
    out, t = np.zeros((2, N)), np.arange(SR // 5) / SR
    for s, wall_db, hz, t60, overtone_db, tray_db, sharp_db in [*SNAPS, *crinkles()]:
        right_db = np.interp(s, *np.transpose(PLACE))
        # only modes above the wall's pitch follow the overtone slope
        modes = [(hz * ratio, db + overtone_db * max(np.log2(ratio), 0), t60) for ratio, db in WALL_MODES]
        wall = ring(modes, t, swell_cycles=.9, scatter_db=1)
        tray = ring(TRAY_MODES, t, swell_cycles=0.56, scatter_db=6.0)
        sway = ring(SWAY_MODES, t, swell_cycles=0.1, scatter_db=-5.0)
        sharp = crack(t, splinter_db, splinter_t60)
        add(out, s, ports(amp(sharp_db + crack_db) * sharp, right_db))
        add(out, s + lag, ports(amp(wall_db + ring_db) * wall, right_db))
        add(out, s + lag, ports(amp(tray_db + thud_db) * tray, right_db=3.0))
        held_db = min(tray_db, -19)  # the grip limits how far the card can swing
        add(out, s + sway_lag, amp(held_db + sway_db) * sway)  # long bending waves travel slowest
    return out


def scene():
    """The pack close up, its echo, the boom of the room, the card's landing and the house."""
    shell = snaps() + dent()
    shell = shell + dome(shell)
    floor = flips()
    card = tearing() + ports(rubbing(), right_db=6.5)
    pack = shell + floor + card
    return pack + boom(shell, card) + echo(shell, floor, card) + landing() + rumble()


def record(dry):
    """The microphone rounds off the highest peaks and keeps nothing above its band limit."""
    rounded = dry / (1 + np.abs(dry / .92) ** 8) ** (1 / 8)
    return filtered(rounded, lambda hz: hz < TOP_HZ)


dry = scene()
out = record(dry)
waveform_to_disk(out)
```